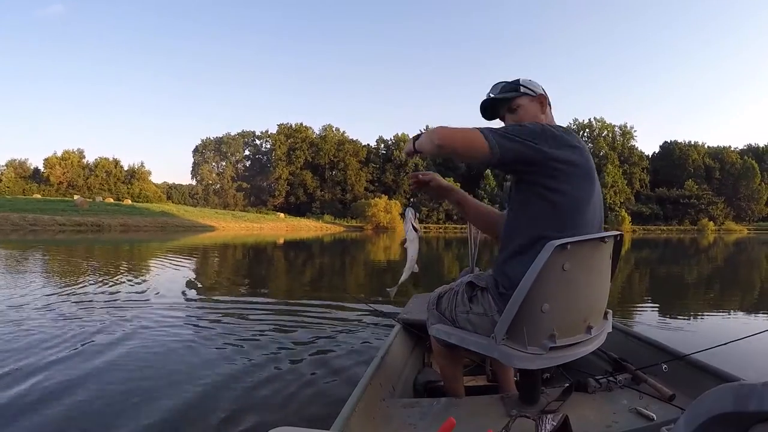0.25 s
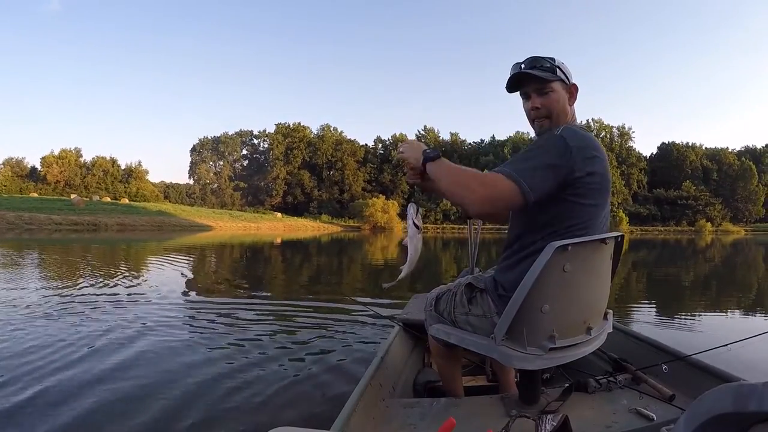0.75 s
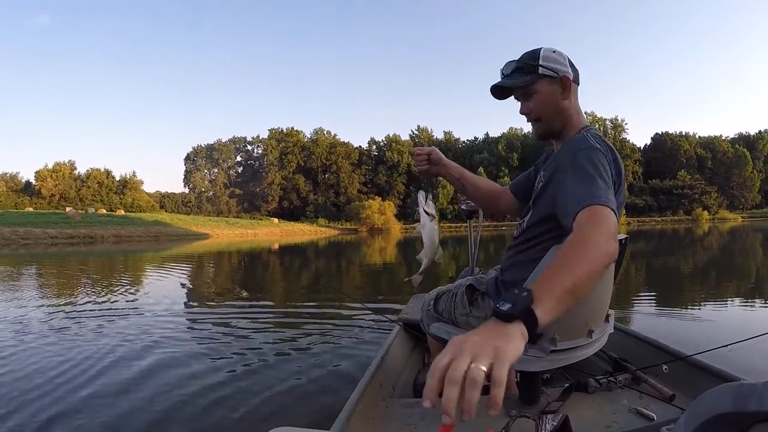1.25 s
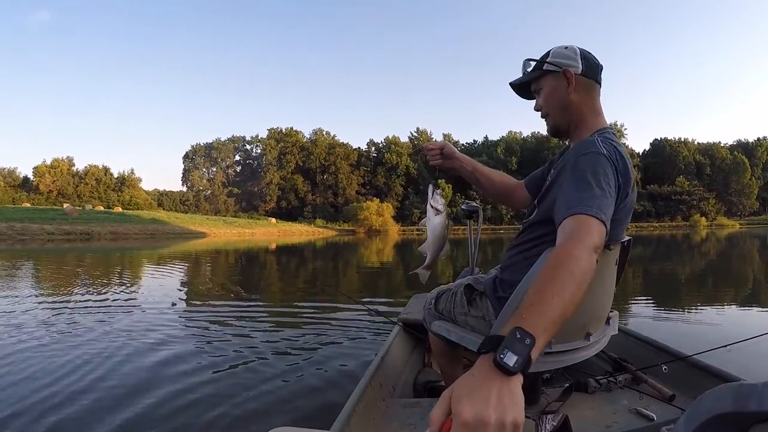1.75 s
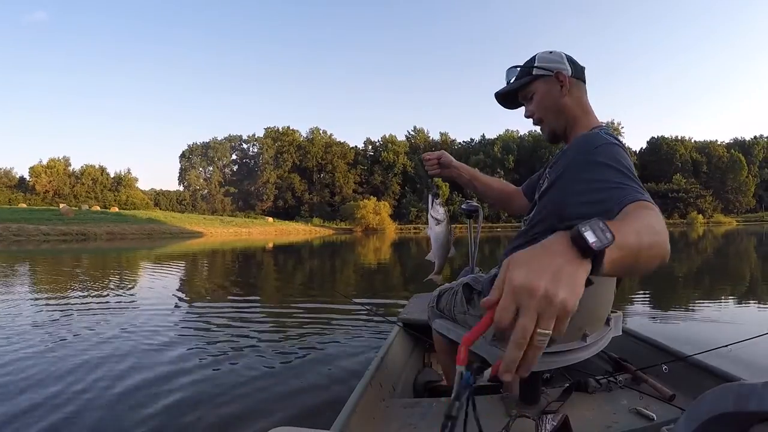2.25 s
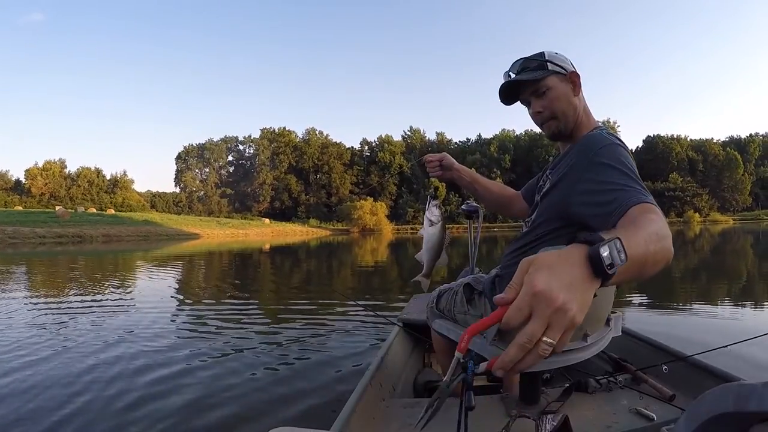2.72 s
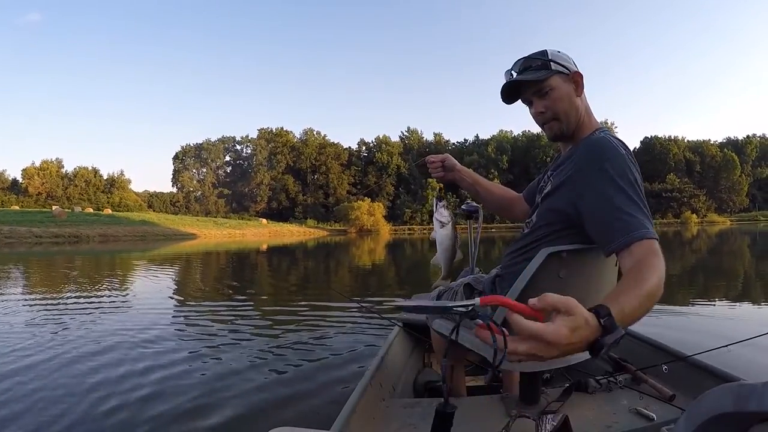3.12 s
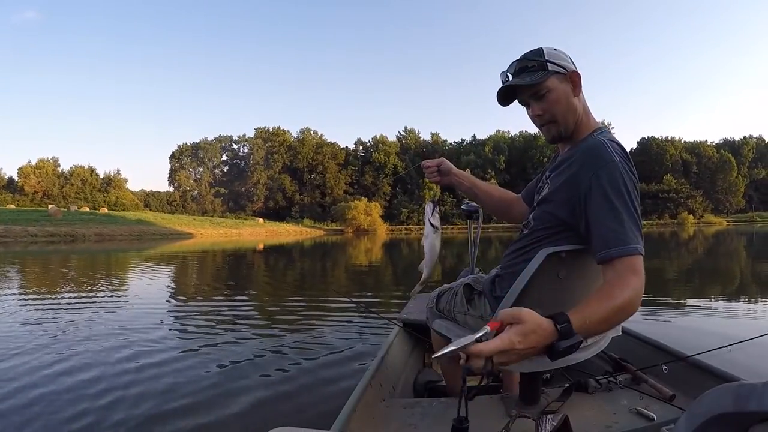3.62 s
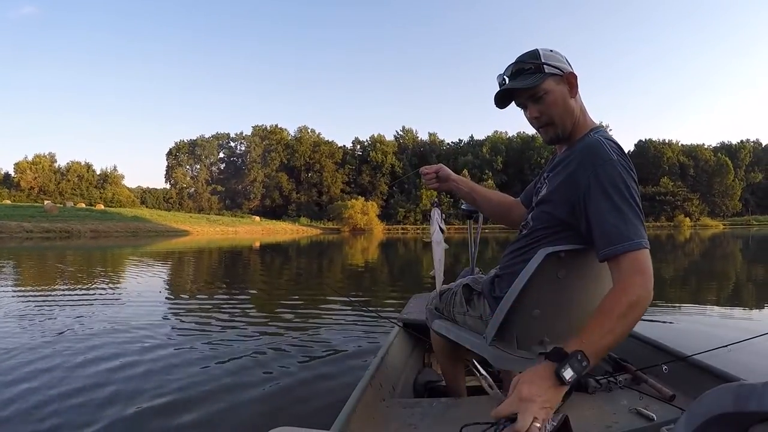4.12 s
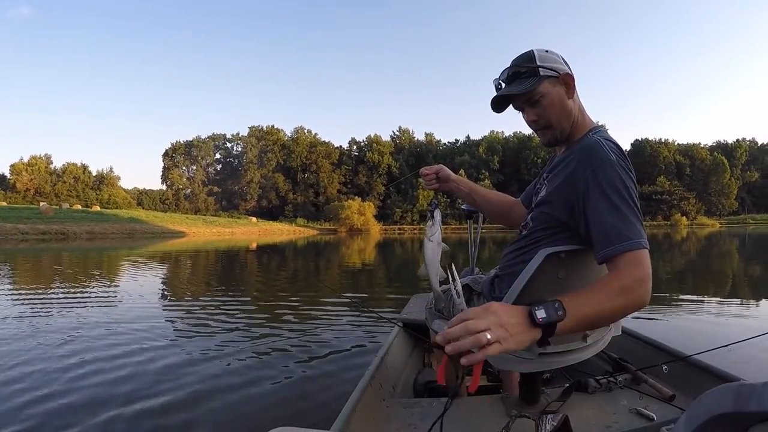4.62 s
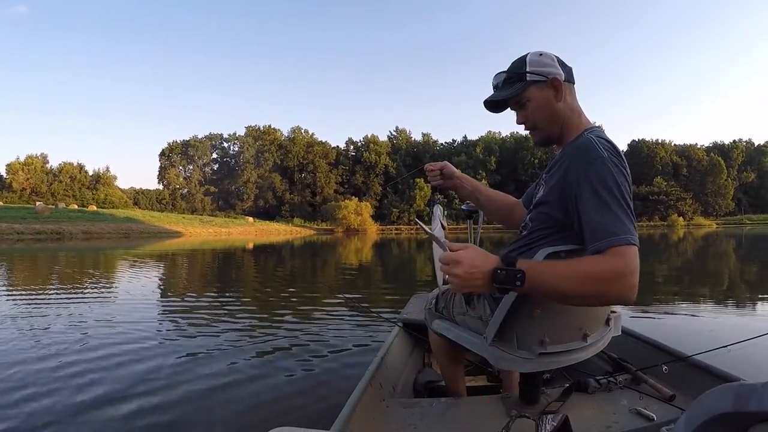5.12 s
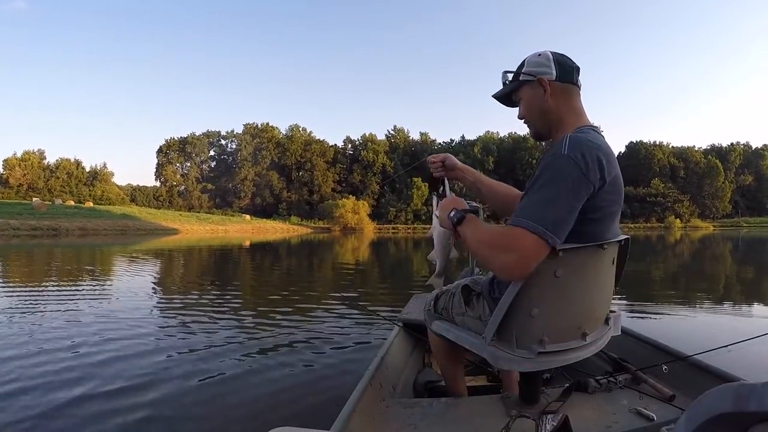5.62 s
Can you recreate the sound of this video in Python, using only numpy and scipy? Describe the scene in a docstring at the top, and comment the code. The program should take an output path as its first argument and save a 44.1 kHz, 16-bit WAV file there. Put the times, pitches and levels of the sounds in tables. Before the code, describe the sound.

On a still lake, a boat seat clacks, pliers and tackle knock and rattle, then a huge thud booms through the metal hull over steady insects.

```python
"""An angler unhooks a fish in a small metal boat on a still lake, heard from close by.
The seat clacks, a knock and a rattle of tackle go with the pliers, and a heavy thud booms through the hull
and clips. Each blow sets decaying tones and noise ringing; the grinding seat and dragging foot are noise
through resonances. Soft rushing, an insect chorus, a ticking insect, air and rumble are shaped noise;
faint birds are gliding or trilled tones."""
import sys
import numpy as np
from scipy import signal
from scipy.fft import rfft, irfft, next_fast_len
from scipy.io import wavfile
from scipy.ndimage import uniform_filter1d

SR = 44100
rng = np.random.default_rng(int(sys.argv[2]) if len(sys.argv) > 2 else 0)


def pcm_store(signal):
    """Save signal as 16-bit PCM."""
    levels = np.round(np.clip(np.atleast_2d(signal), -1, 1) * 32767)
    wavfile.write(sys.argv[1], SR, levels.astype(np.int16).T)


N = 258867
TIME = np.arange(N) / SR


def boat(lowest_hz=40):
    """All struck parts of the boat together, with the deepest bass cut away."""
    parts = hull() + deck() + seat() + tackle() + pliers()
    bass_cut = signal.butter(2, lowest_hz, "high", fs=SR, output="sos")
    return signal.sosfilt(bass_cut, parts)


def hull():
    """A heavy thud and its rebound set the large metal shell booming for a long time."""
    # Blows: (time [s], force [dB], contact hardness [Hz], ring time [times the free ring time])
    hull_blows = [(4.9258, 4, 11500, 0.61), (4.9705, -10, 450, 0.73), (5.022, -9.5, 5400, 0.8),
                  (5.031, -16.5, 8950, 0.5)]
    # Strong tones of the shell: (frequency [Hz], level [dB], time to fall 60 dB [s])
    hull_modes = [(43.5, -15.5, 1), (100.7, -16, 1), (116.7, -12, 1), (147.1, -4.5, 0.96),
                  (185.5, -8, 0.72), (234.2, -11.5, 0.73), (261.6, -10, 0.62), (323.6, -10, 0.43),
                  (399, -14.5, 0.52), (462.4, -15.5, 0.55), (619, -11.5, 0.27), (759, -14.5, 0.27),
                  (923, -22, 0.38), (1159, -15.5, 0.28), (1246, -8.5, 0.14), (1667, -22.5, 0.28),
                  (2077, -14, 0.087)]
    # Crowded weaker tones: (frequency [Hz], level [dB per Hz], time to fall 60 dB [s])
    hull_wash = [(40, -45, .55), (180, -34, .5), (420, -31, .3), (800, -40, .19), (2400, -39, .16),
                 (5000, -46, .11), (9000, -55, .09), (15000, -58, .08)]
    return struck(hull_blows, hull_modes, hull_wash, size=36000)


def deck():
    """Knocks on the deck sound drier: most of its strong tones die sooner than the hull's."""
    # Blows: (time [s], force [dB], contact hardness [Hz], ring time [times the free ring time])
    deck_blows = [(1.9685, -20, 3080, 1.08), (1.986, -19.5, 129, 2), (2.041, -29.5, 2500, 1.3),
                  (2.124, -35, 4000, 0.29), (2.2353, 1, 6000, 0.93), (2.2615, -17, 623, 0.33),
                  (3.987, -18.5, 90.5, 1.9)]
    # Strong tones of the deck: (frequency [Hz], level [dB], time to fall 60 dB [s])
    deck_modes = [(80.6, -10.5, 0.26), (115.4, -10.5, 0.35), (174.4, -17, 0.36), (237.8, -6.5, 0.22),
                  (332, -12, 0.026), (394, -2.5, 0.045), (444, -7, 0.073), (650, -16, 0.099)]
    # Crowded weaker tones: (frequency [Hz], level [dB per Hz], time to fall 60 dB [s])
    deck_wash = [(40, -41, 1), (117, -36, 0.32), (440, -27.5, 0.13), (1000, -42, 0.14),
                 (2200, -50.5, 0.096), (4860, -56.5, 0.11), (15000, -87, 0.11)]
    return struck(deck_blows, deck_modes, deck_wash, size=20000)


def seat():
    """The swivel seat clacks: short blows ring its tones."""
    # Blows: (time [s], force [dB], contact hardness [Hz], ring time [times the free ring time])
    seat_blows = [(.039, -12.5, 4200, 1.9), (.487, -17.5, 12000, 1.1), (.6965, 1, 10000, 0.87),
                  (.7378, 0.5, 9900, 1.56), (.756, -8, 9000, 0.95), (.860, -16.5, 3000, 0.9)]
    # Strong tones of the seat: (frequency [Hz], level [dB], time to fall 60 dB [s])
    seat_modes = [(127.6, -31, 0.72), (286.5, -30, 0.34), (563, -34.5, 0.39), (1090, -29.5, 0.18),
                  (1186, -27.5, 0.11), (1475, -31, 0.1), (1603, -27, 0.082), (1733, -33, 0.13),
                  (2935, -29.5, 0.091)]
    # Crowded weaker tones: (frequency [Hz], level [dB per Hz], time to fall 60 dB [s])
    seat_wash = [(60, -56, 0.92), (302, -61, 0.4), (1010, -58, 0.25), (1550, -54, 0.1),
                 (3180, -61.5, 0.093), (6800, -62, 0.046), (14000, -86, 0.079)]
    return struck(seat_blows, seat_modes, seat_wash, size=20000)


def tackle(hardness_hz=3500, ring_share=0.4, ring_doubling_db=19.5):
    """Loose tackle jolts and settles; a harder jolt leaves it ringing longer."""
    # Jolts: (time [s], force [dB])
    tackle_blows = [(2.2349, -12), (2.2618, -5.5), (2.2843, -11), (2.321, -19.5), (2.342, -24),
                    (2.360, -17.5), (2.438, -24), (2.4754, -20.5), (2.5015, -23), (3.4372, -20),
                    (3.96, -23)]
    # Strong tones of the tackle: (frequency [Hz], level [dB], time to fall 60 dB [s])
    tackle_modes = [(1308, -31, .12), (1766, -22, .15), (1915, -26, .14), (2552, -24, .07),
                    (2790, -27, .06), (3332, -29, .09)]
    # Crowded weaker tones: (frequency [Hz], level [dB per Hz], time to fall 60 dB [s])
    tackle_wash = [(300, -71, 0.042), (1100, -38, 0.13), (2190, -38, 0.016), (4500, -57, 0.13),
                   (12000, -54, 0.16)]
    jolts = []
    for s, force_db in tackle_blows:
        share = ring_share * 2 ** (force_db / ring_doubling_db)
        jolts.append((s, force_db, hardness_hz, share))
    return struck(jolts, tackle_modes, tackle_wash, size=6000)


def pliers():
    """The pliers snap once, short and steely: high tones that die at once."""
    # Blow: (time [s], force [dB], contact hardness [Hz], ring time [times the free ring time])
    plier_blows = [(2.2423, 2.5, 15000, 0.45)]
    # Strong tones of the pliers: (frequency [Hz], level [dB], time to fall 60 dB [s])
    plier_modes = [(3780, -9, 0.024), (4550, -6.5, 0.019), (5560, -19, 0.017)]
    # Crowded weaker tones: (frequency [Hz], level [dB per Hz], time to fall 60 dB [s])
    plier_wash = [(1500, -62, .01), (4500, -41, .01), (8000, -48, .009), (15000, -49, .009)]
    return struck(plier_blows, plier_modes, plier_wash, size=2000)


def struck(blows, modes, wash, size):
    """Each blow sets a body ringing; a soft contact dulls it, a lingering one damps it."""
    out, t = np.zeros(N), np.arange(size) / SR
    for s, force_db, hardness_hz, ring_share in blows:
        age = t / ring_share  # a small share makes the ring age faster
        ring = dense_ring(wash, age)
        for hz, db, t60 in modes:
            ring = ring + from_db(db) * np.sin(2 * np.pi * hz * t) * decay(age, t60)
        contact = signal.butter(2, min(hardness_hz, SR / 2 - 1000), fs=SR, output="sos")
        add(out, s, from_db(force_db) * signal.sosfilt(contact, ring))
    return out


def dense_ring(wash, age):
    """Crowded tones merge into noise; each frequency band dies at its own pace."""
    edges_hz = np.geomspace(30, 17000, 19)
    white = rng.standard_normal((2, len(age))) * np.sqrt(SR / 2)  # unit power per Hz
    out = 0
    for k, (low, high) in enumerate(zip(edges_hz, edges_hz[1:])):
        band_filter = signal.butter(2, [low, high], "band", fs=SR, output="sos")
        band = signal.sosfilt(band_filter, white[k % 2])  # neighbouring bands use different noise
        hz = np.sqrt(low * high)
        out = out + band * from_db(at_hz(wash, hz)) * decay(age, at_hz(wash, hz, axis=2))
    return out


def swivel():
    """The seat grinds on its swivel as the angler turns, humming in its resonances."""
    # Turns: (time [s], length [s], level [dB])
    turns = [(0, 0.14, -42.5), (.46, 0.33, -43.5)]
    # Rise and fall: (attack [s], sag [dB per s], release [dB per s])
    turn_shape = (0.035, 4, 150)
    # Resonances of the grinding seat: (frequency [Hz], width [Hz], level [dB])
    swivel_modes = [(223, 85, -3), (290, 31, -5.5), (654, 150, -15)]
    return rub(turns, turn_shape, swivel_modes)


def foot():
    """A foot drags over the deck in two pushes and stirs low resonances."""
    # Pushes: (time [s], length [s], level [dB])
    pushes = [(3.95, 0.049, -27.5), (4.05, 0.045, -24)]
    # Rise and fall: (attack [s], sag [dB per s], release [dB per s])
    push_shape = (0.04, 5, 98)
    # Resonances that the foot stirs: (frequency [Hz], width [Hz], level [dB])
    foot_modes = [(106, 16, -0.5), (128.3, 25, -0.5), (184, 29, -9.5)]
    return rub(pushes, push_shape, foot_modes)


def rub(strokes, shape, modes):
    """Sliding friction is noise that keeps a panel humming in its resonances."""
    friction, hum = rng.standard_normal(N), 0
    for hz, width_hz, db in modes:
        resonance = signal.iirpeak(hz, hz / width_hz, fs=SR)
        once = signal.lfilter(*resonance, friction)
        twice = signal.lfilter(*resonance, once)
        hum = hum + from_db(db) * rms_one(twice)
    # steady pressure evens out the strength of the hum
    strength = np.sqrt(uniform_filter1d(hum ** 2, size=2000) + 1e-9)
    return envelope(strokes, shape) * hum / strength


def rush(flutter_db=3.0, flutter_per_s=110):
    """Soft, slightly uneven rushing: coloured noise in spells that start quickly and sag."""
    # Spells: (time [s], length [s], level [dB])
    spells = [(0, 0.18, -40.5), (.45, 0.27, -44), (.975, .48, -42), (1.72, 0.99, -46)]
    # Rise and fall: (attack [s], sag [dB per s], release [dB per s])
    spell_shape = (0.011, 9.2, 180)
    # Colour of the noise: (frequency [Hz], relative level [dB per Hz])
    rush_colour = [(35, -25), (100, 10), (260, 5), (500, -2.5), (1100, -7.5), (2200, -6), (5000, -24),
                   (10000, -23), (15000, -28)]
    flutter = from_db(flutter_db * drift(flutter_per_s))
    return envelope(spells, spell_shape) * noise(rush_colour) * flutter


def insects(level_db=-44, shimmer_db=0.53, shimmer_per_s=300, swell_db=1.0, swell_per_s=0.74):
    """So many far singers that their pulses blur into a shimmering band of noise."""
    # Colour of the chorus: (frequency [Hz], relative level [dB per Hz])
    chorus = [(2700, -13), (3050, -6.5), (3350, 0), (4000, 0.5), (4700, -1.5), (5500, 2), (6150, -4),
              (6500, -1), (6950, -6), (7600, -2.5), (8100, -8.5), (8600, -17), (11000, -22)]
    shimmer = shimmer_db * drift(shimmer_per_s)
    swell = swell_db * drift(swell_per_s)
    return from_db(level_db + shimmer + swell) * noise(chorus)


def ticker(start_s=2.44, end_s=4.3, gap_s=.1, tick_s=0.016, tick_db=-62, tick_hz=13500):
    """One nearer insect ticks faintly, very high up: short bursts of narrow noise."""
    gate, s = np.zeros(N), start_s
    while s < end_s:
        add(gate, s, np.hanning(int(tick_s * SR)))
        s += gap_s * rng.uniform(.7, 1.3)
    resonance = signal.iirpeak(tick_hz, 6, fs=SR)
    tone = rms_one(signal.lfilter(*resonance, rng.standard_normal(N)))
    return from_db(tick_db) * gate * tone


def birds(waver_hz=45):
    """Far birds buzz and whistle, their pitch wavering a little."""
    return buzzes(waver_hz) + whistles(waver_hz)


def buzzes(waver_hz, buzz_db=-45.5, buzz_hz=3620, trill_hz=182, trill_depth=2.4):
    """A fast trill of the phase (depth in radians) splits each note into a comb of lines."""
    # Buzzing calls, all equally far off: (time [s], length [s])
    calls = [(.27, 0.1), (.91, 0.25), (1.48, 0.18), (2.0, 0.29), (3.02, .28), (4.06, .25), (4.8, 0.13),
             (5.7, 0.19)]
    out = np.zeros(N)
    for s, length in calls:
        t = TIME[:int(length * SR)]
        pitch = buzz_hz + waver_hz * (rng.normal() + drift(5.7)[:len(t)])
        trill = trill_depth * np.sin(2 * np.pi * trill_hz * t)
        phase = 2 * np.pi * np.cumsum(pitch) / SR + trill
        add(out, s, from_db(buzz_db) * np.sqrt(np.hanning(len(t))) * np.sin(phase))
    return out


def whistles(waver_hz, whistle_db=-49, middle_hz=2920):
    """Thin tones glide in a straight line through one middle pitch."""
    # Whistles: (time [s], length [s], glide from start to end [Hz])
    glides = [(3.78, 0.031, -350), (4.108, .025, -300), (4.403, 0.029, 650), (4.477, 0.021, -750),
              (4.619, 0.11, -600), (4.79, .023, -750), (4.872, .06, 550), (5.373, 0.056, -400),
              (5.637, 0.14, 600)]
    out = np.zeros(N)
    for s, length, glide_hz in glides:
        size = int(length * SR)
        glide = glide_hz * np.linspace(-.5, .5, size)
        pitch = middle_hz + glide + waver_hz * drift(164)[:size]
        tone = np.sin(2 * np.pi * np.cumsum(pitch) / SR)
        add(out, s, from_db(whistle_db) * signal.windows.tukey(size, .5) * tone)
    return out


def lake():
    """The open lake: a low rumble under a wash of air."""
    return rumble() + air()


def rumble(level_db=-39.5, sway_db=1.0, sways_per_s=1.8):
    """Low noise whose level sways gently."""
    # Colour of the rumble: (frequency [Hz], relative level [dB per Hz])
    rumble_colour = [(20, 2.5), (42, -8.5), (65, 2.5), (100, -4.5), (150, -12), (230, -19.5), (400, -19.5)]
    return from_db(level_db + sway_db * drift(sways_per_s)) * noise(rumble_colour)


def air(level_db=-52, swell_db=5.5, peak_s=4.01, swell_s=1.6):
    """A wash of noise from the open air that swells once."""
    # Colour of the air: (frequency [Hz], relative level [dB per Hz])
    air_colour = [(100, -8), (300, -12), (550, 3), (950, 6), (1500, -3), (2500, -12), (9000, -39),
                  (15000, -22)]
    swell = swell_db * np.exp(-((TIME - peak_s) / swell_s) ** 2)
    return from_db(level_db + swell) * noise(air_colour)


def from_db(db):
    """Decibels to gain."""
    return 10 ** (np.asarray(db) / 20)


def rms_one(x):
    """Scale to unit power."""
    return x / np.sqrt(np.mean(x ** 2) + 1e-20)


def decay(age, t60):
    """Ringing that falls by 60 dB, a thousandfold, in t60 seconds."""
    return np.exp(-np.log(1000) * age / t60)


def at_hz(rows, hz, axis=1):
    """Read one column of a table on a log-frequency axis."""
    rows = np.array(rows)
    return np.interp(np.log(np.maximum(hz, 1)), np.log(rows[:, 0]), rows[:, axis])


def add(out, s, sound):
    """Mix a sound in at a given time in seconds."""
    start = max(round(s * SR), 0)
    out[start:start + len(sound)] += sound[:max(N - start, 0)]


def drift(rate):
    """Random wander around 0: straight lines join random points, rate of them per second."""
    knots = rng.standard_normal(4096)
    return np.interp(TIME * rate, np.arange(len(knots)), knots)


def noise(spectrum):
    """Steady noise of unit power that falls away steeply past both ends of its spectrum."""
    size = next_fast_len(N)
    hz = np.arange(size // 2 + 1) * SR / size + 1  # +1 avoids dividing by zero
    low_end = 1 + (spectrum[0][0] / hz) ** 4
    high_end = 1 + (hz / spectrum[-1][0]) ** 8
    gain = from_db(at_hz(spectrum, hz)) / np.sqrt(low_end * high_end)
    white = rfft(rng.standard_normal(size))
    return rms_one(irfft(white * gain, size)[:N])


def envelope(events, shape):
    """Each event rises, sags slowly while it lasts, then dies away."""
    attack_s, sag_db_per_s, release_db_per_s = shape
    gain = np.zeros(N)
    for s, length, db in events:
        age = np.maximum(TIME - s, 0)
        rise = np.minimum(age / attack_s, 1)
        release_db = release_db_per_s * np.maximum(age - length, 0)
        gain += rise * from_db(db - sag_db_per_s * age - release_db)
    return gain


def scene(width_db=-3, width_top_hz=3000):
    """Everything sits in the centre; only the lower part of the rushing noise has some width."""
    mid = boat() + swivel() + foot() + rush() + insects() + ticker() + birds() + lake()
    low_pass = signal.butter(2, width_top_hz, fs=SR, output="sos")
    side = from_db(width_db) * signal.sosfilt(low_pass, rush())
    return mid + side * np.array([[1], [-1]])  # left gets plus, right gets minus


def record(dry, cutoff_hz=16000):
    """The heaviest blows clip flat at full scale; then the top of the treble is cut."""
    clipped = np.clip(dry, -1, 1)
    treble_cut = signal.ellip(10, .1, 80, cutoff_hz, fs=SR, output="sos")
    return signal.sosfilt(treble_cut, clipped)


dry = scene()
out = record(dry)
pcm_store(out)
```